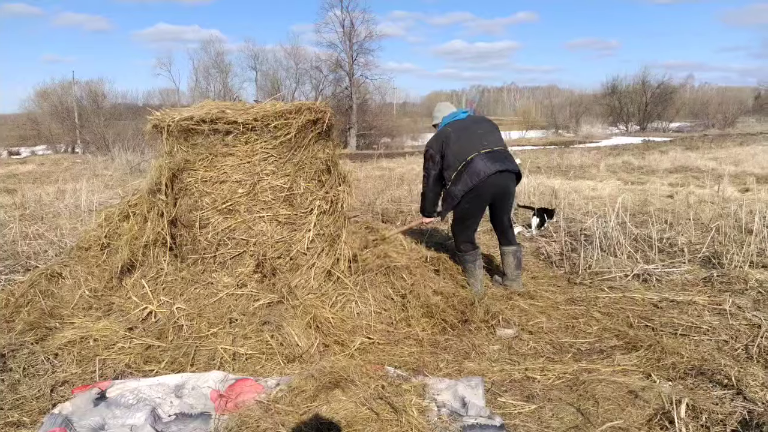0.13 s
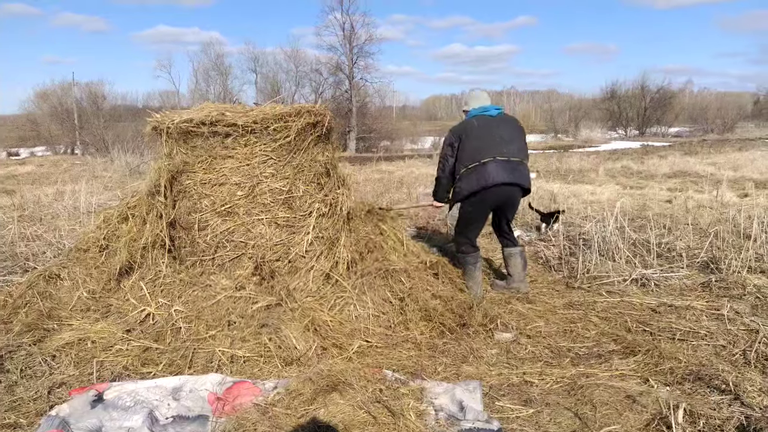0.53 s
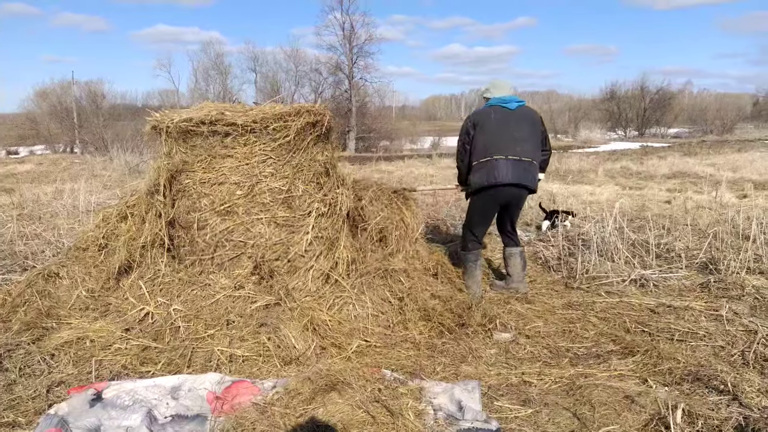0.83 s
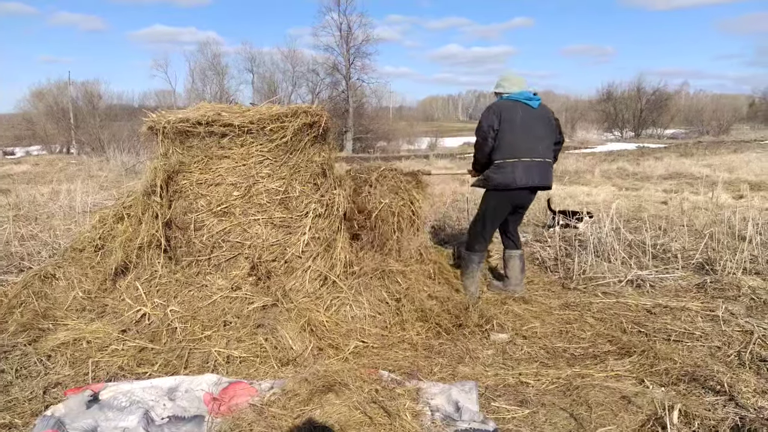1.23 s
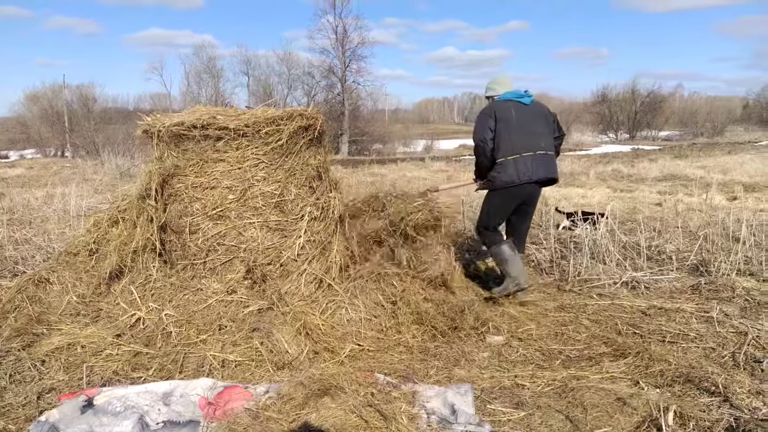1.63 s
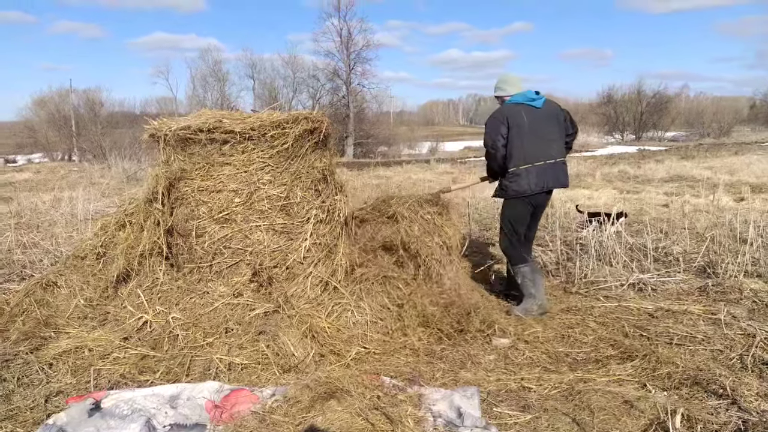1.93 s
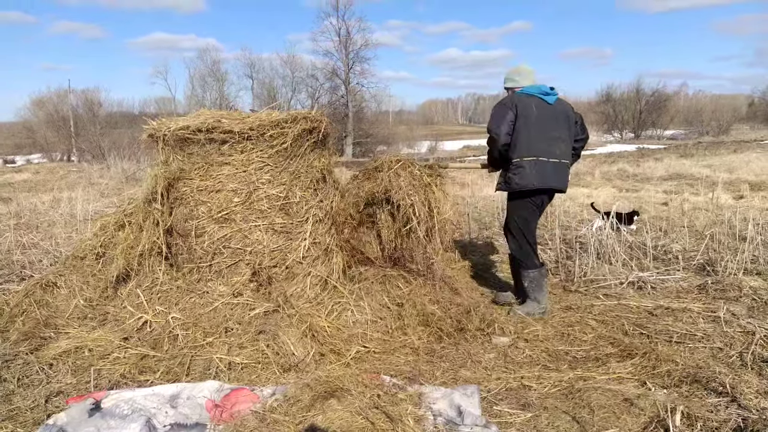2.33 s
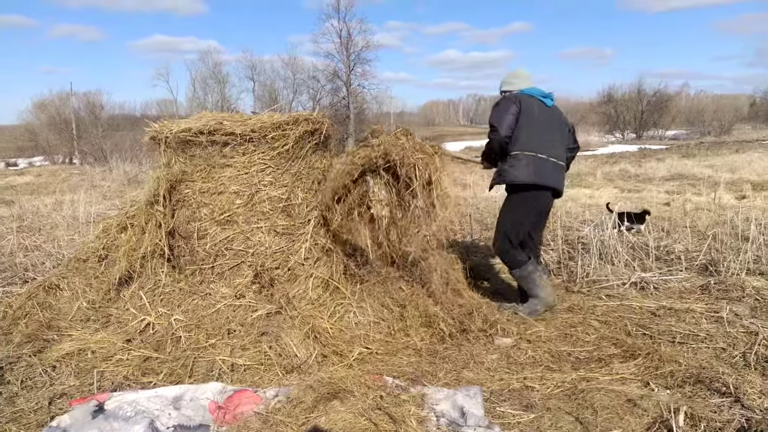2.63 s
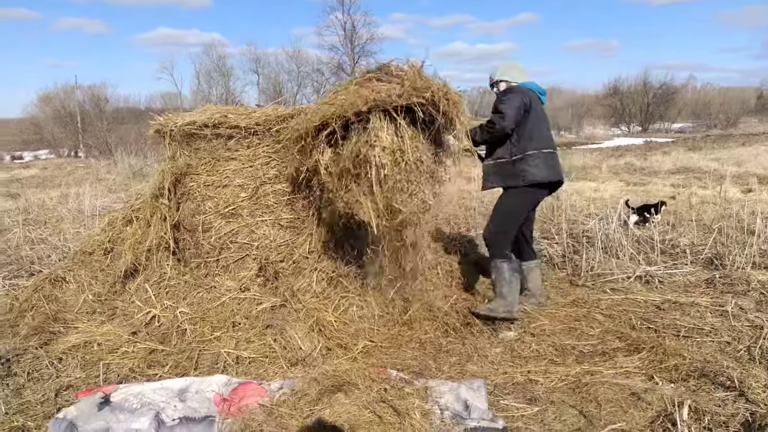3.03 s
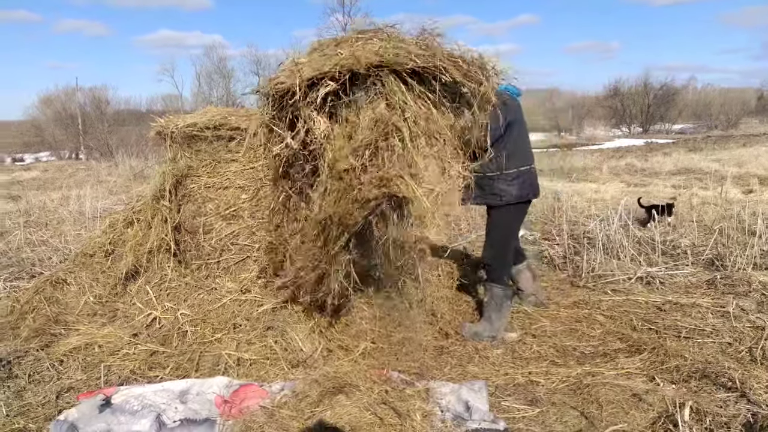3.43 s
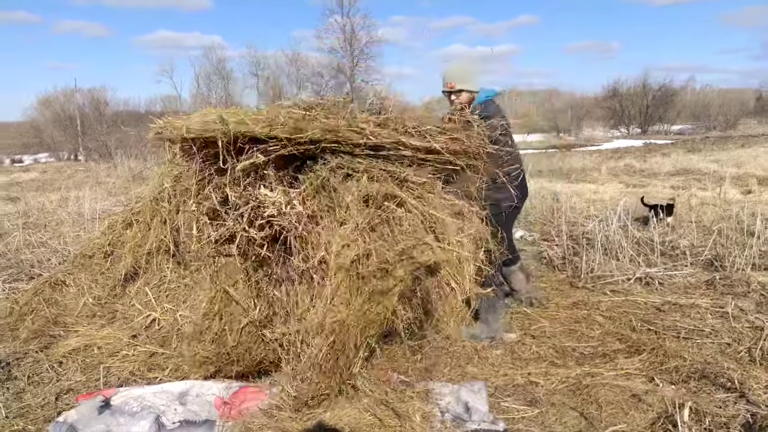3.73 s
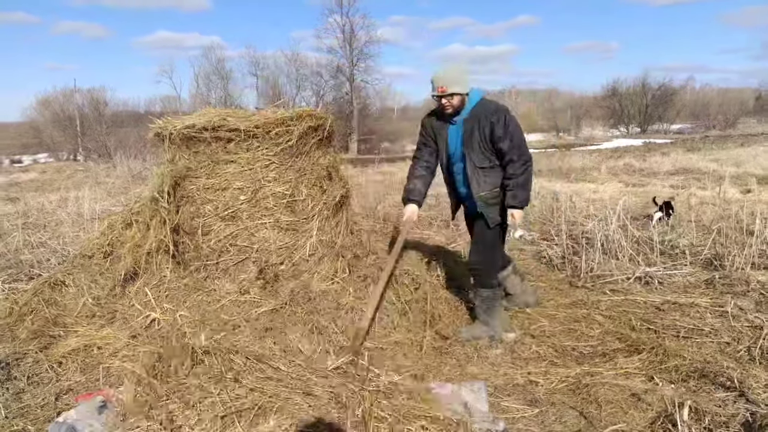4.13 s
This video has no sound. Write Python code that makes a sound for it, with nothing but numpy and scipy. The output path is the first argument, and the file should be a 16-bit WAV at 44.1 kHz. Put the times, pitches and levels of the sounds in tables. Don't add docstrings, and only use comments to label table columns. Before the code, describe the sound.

Wind buffets a small camera outdoors while hay swishes and crackles, ending in a sudden loud, bright rustle near the microphone.

```python
import sys
import numpy as np
from scipy import signal
from scipy.fft import rfft, irfft
from scipy.io import wavfile
from scipy.ndimage import uniform_filter1d

SR = 44100
rng = np.random.default_rng(int(sys.argv[2]) if len(sys.argv) > 2 else 0)


def field_ratio(decibels):
    return 10 ** (np.asarray(decibels, dtype=float) / 20)


def wrap_up_sound(samples):
    columns = np.atleast_2d(samples).T
    tamed = np.clip(columns, -1, 1)
    steps = np.round(tamed * 32767).astype(np.int16)
    wavfile.write(sys.argv[1], SR, steps)


N = 188174


def evened(x):
    return x / np.sqrt(np.mean(x ** 2) + 1e-20)


def smooth_noise(shape, *sizes):
    noise = rng.standard_normal(shape)
    for axis, size in enumerate(sizes):
        noise = uniform_filter1d(noise, size, axis=axis)
    return evened(noise)


def read(points, hz):
    f, value = np.transpose(points)
    return np.interp(np.log(hz + 1), np.log(f + 1), value)[:, None]


def columns(rows, t):
    s, *values = np.transpose(rows)
    return [np.interp(t, s, v) for v in values]


def add(mix, s, sound):
    at = round(s * SR) - len(sound) // 2
    part = mix[max(at, 0):at + len(sound)]
    part += sound[max(-at, 0):][:len(part)]


def ticks(per_s, spread_db):
    chance = rng.random((2, N))
    size = np.minimum(rng.exponential(1, (2, N)), 5)
    sign = rng.standard_normal((2, N))
    return evened((chance < per_s / SR) * field_ratio(spread_db * size) * sign)


# time_s, rubbing_level_db
EFFORT = [(0.0, -63), (0.07, -67), (0.18, -58.5), (0.32, -58), (0.4, -56), (1.26, -47), (1.42, -46.5),
          (1.54, -49.5), (1.78, -54), (1.88, -54.5), (2.3, -47.5), (2.42, -49.5), (2.84, -48.5),
          (3.27, -52), (3.36, -51.5), (3.42, -55.5), (3.46, -52.5), (3.64, -55), (3.81, -52.5),
          (3.93, -46.5), (3.99, -39.5), (4.1, -41), (4.16, -40.5), (4.27, -41)]
# time_s, nearness (0 at the stack, 1 at the camera), left_port_delay_ms
PATH = [
    (0, 0, 0.0),
    (1.9, .03, 0.0),
    (3.1, .1, .012),
    (3.7, .45, .06),
    (3.93, .97, .18),
    (4.12, .97, .185),
    (4.27, .97, .15),
]
# frequency_hz, level_db
FAR_LEFT_COLOUR = [(500, -22), (900, -22.5), (2000, -17), (3000, -19), (3200, -21), (3500, -24.5),
                   (3900, -24.5), (4100, -42), (4300, -28.5), (4800, -16.5), (6400, -12.5), (8000, -20),
                   (8500, -24), (9500, -5.5), (10800, 3.5), (11900, 1.5), (12300, -11)]
FAR_RIGHT_COLOUR = [(500, -20.5), (900, -21.5), (1800, -21.5), (2200, -17), (2600, -20), (3200, -16.5),
                    (4500, -16.5), (6500, -11.5), (9300, -5.5), (10800, -9.5), (11900, -11.5), (12300, -91)]
# frequency_hz, level_db
NEAR_LEFT_COLOUR = [(500, -19), (900, -17.5), (2000, -4), (2400, 0.5), (2600, -12.5), (2800, -3.5),
                    (3100, -18), (3500, -30), (3900, -11.5), (4800, -5.5), (6400, 8), (8000, -6), (8500, 4),
                    (9500, 8.5), (10800, 10), (11900, 13), (12300, -18)]
NEAR_RIGHT_COLOUR = [(500, -8.5), (900, -10.5), (1800, -1.5), (2400, -7), (2600, -15.5), (2900, 1.5),
                     (3200, 0), (4500, 0), (6500, 5), (9300, 10.5), (10800, 6.5), (11900, 4.5),
                     (12300, -51)]
# frequency_hz, level_db
FAR_TOP = [(12050, -50), (12300, -32), (13330, -29), (13480, -19), (14700, -19), (14900, -21.5),
           (15700, -22)]
NEAR_TOP = [(12050, -9), (12300, -5), (13200, -5), (14500, -4), (14800, -8.5), (15700, -10)]
# frequency_hz, likeness (0-1)
FAR_LIKENESS = [(500, 0.43), (1700, 0.95), (2500, 0.94), (3000, 0.08), (4000, 0.2), (5000, 0.72),
                (7000, 0.37), (10000, 0), (12000, 0.3)]
NEAR_LIKENESS = [(500, 0.86), (1700, 0.71), (2200, 0.19), (2700, 0.93), (3300, 0.087), (5000, 0.077),
                 (7000, 0.1), (12000, 0.04)]
# time_s, half_length_s, lift_db, hollow_ring_db
SLIPPING = [
    (1.387, 0.092, 1, -3),
    (0.472, 0.087, 2, 0.5),
    (1.778, 0.086, 3.5, 5.5),
    (2.542, 0.073, 0, 8),
    (3.338, 0.025, 2.5, 6),
    (4.128, 0.058, 3, -4),
]


def hay():
    clumps = smooth_noise(N, 900)
    rub = ticks(per_s=22000, spread_db=-0.43)
    rub = rub * field_ratio(0.5 * clumps + 0.52 * smooth_noise(N, 90))
    hz, t, (one, other) = signal.stft(rub, SR, nperseg=512, noverlap=384)
    row_hz = hz[:, None]
    level_db = columns(EFFORT, t)[0]
    near, delay_ms = columns(PATH, t)
    near = np.clip(near, 0, 1)

    def blend(far, close):
        return (1 - near) * read(far, hz) + near * read(close, hz)

    lean_left_db, top_right_db = -1.32, -33
    flicker = smooth_noise(one.T.shape, 9, 10).T
    top = field_ratio(blend(FAR_TOP, NEAR_TOP) + 3 * flicker)
    below = row_hz < 11990
    left = below * field_ratio(blend(FAR_LEFT_COLOUR[:-1], NEAR_LEFT_COLOUR[:-1]) + lean_left_db / 2) + top
    right = below * field_ratio(blend(FAR_RIGHT_COLOUR[:-1], NEAR_RIGHT_COLOUR[:-1]) - lean_left_db / 2)
    right = right + top * field_ratio(top_right_db)
    fine = (hz > 5000) & (hz < 11800)
    loud = np.sqrt((left ** 2 + right ** 2)[fine].sum(0) / (4 * len(hz)))

    coarse_db = -17 + 0.2756 * np.maximum(-49.5 - level_db, 0)
    coarse = (coarse_db + 15.5) / (1 + (row_hz / 3800) ** 6)
    coarse += 4.1 * np.exp(-((row_hz - 800) / 120) ** 2)
    for s, half_s, lift_db, ring_db in SLIPPING:
        ring = ring_db * np.exp(-((row_hz - 750) / 250) ** 2)
        coarse += np.exp(-((t - s) / half_s) ** 2) * (lift_db + ring)
    patches = smooth_noise(one.T.shape, 20, 8).T
    gain = field_ratio(level_db + coarse + 0.85 * patches) / loud

    same = np.clip(blend(FAR_LIKENESS, NEAR_LIKENESS), 0, 1)
    delay_s = delay_ms / 1000 / (1 + (1500 / (row_hz + 1)) ** 4)
    late = np.exp(-2j * np.pi * row_hz * delay_s)
    at_left = left * (same * one * late + np.sqrt(1 - same ** 2) * other)
    z = np.array([at_left, right * one]) * gain
    return signal.istft(z, SR, nperseg=512, noverlap=384)[1][:, :N]


# start_s, hold_s, left_db, right_db
GUST_LEVELS = [(0, 0.035, -55, -41), (0.067, 0.051, -49, -48), (0.154, 0.23, -55.5, -52),
               (0.467, 0.086, -60, -65), (0.584, 0.069, -57, -47), (0.639, 0.057, -53, -48.5),
               (0.717, 0.023, -44.5, -57), (0.779, 0.12, -49, -42.5), (0.901, 0.15, -49, -45.5),
               (1.067, 0.05, -69, -58), (1.169, 0.04, -67, -55.5), (1.285, .03, -53.5, -55),
               (1.308, 0.095, -56, -43), (1.424, 0.025, -49.5, -50), (1.46, 0.1, -72, -54),
               (1.544, 0.057, -49, -56.5), (1.62, 0.064, -67, -49), (1.714, 0.068, -49, -46.5),
               (1.81, 0.065, -45, -51), (1.92, 0.13, -48, -44.5), (2.048, 0.089, -61, -43.5),
               (2.16, 0.16, -71.5, -66.5), (2.432, 0.047, -72, -59), (2.49, 0.1, -60, -44.5),
               (2.612, 0.054, -76, -55.5), (2.744, .05, -67, -71), (2.86, 0.12, -55.5, -49),
               (2.99, 0.15, -56.5, -49.5), (3.116, 0.061, -43, -44), (3.189, 0.097, -54, -48),
               (3.361, 0.071, -50, -47), (3.43, 0.13, -57, -41.5), (3.595, 0.073, -53, -49.5),
               (3.739, 0.019, -64, -54), (3.777, 0.05, -65.5, -70), (3.85, 0.085, -78, -61.5),
               (3.917, 0.038, -56, -51), (3.994, 0.041, -59, -54.5), (4.052, 0.11, -53.5, -59.5),
               (4.19, .1, -65, -48.5)]


def gusts():
    rise_db_per_s, fall_db_per_s, calm_db = 581, 504, -75
    t = np.arange(0, N / SR + .01, .002)
    start, hold, *port_db = np.transpose(GUST_LEVELS)[:, :, None]
    away_db = np.maximum(rise_db_per_s * (start - t), 0)
    away_db = away_db + np.maximum(fall_db_per_s * (t - start - hold), 0)
    power = [(field_ratio(db - away_db) ** 2).sum(0) + field_ratio(calm_db) ** 2 for db in port_db]
    return np.array([np.interp(np.arange(N) / SR, t, np.sqrt(p)) for p in power])


def eddy(width_ms):
    u = np.arange(-900, 900) / SR * 1000 / width_ms

    def bump(at, wide):
        return np.exp(-4 * np.log(2) * ((u - at) / wide) ** 2)

    push = bump(0, 1.131)
    dips = 0.33 * bump(-1.2, 1.8) + 0.47 * bump(1.27, 1.27)
    shape = push - dips * push.sum() / dips.sum()
    return shape / shape.max()


# time_s, peak_db, width_ms
LEFT_PUSHES = [(0.1054, -32.5, 2), (0.2236, -35.5, 2.3), (0.2395, -37.0, 1.75), (0.7127, -29.0, 1.5),
               (0.7166, -37.5, 1.75), (0.7211, -32.0, 1.75), (0.8454, -29.0, 1.5), (0.8485, -34.0, 1.2),
               (0.8603, -27.0, 2), (0.8794, -34.5, 2.7), (0.9084, -39.5, 1.5), (0.9177, -33.0, 1.75),
               (0.9247, -36.5, 1.2), (0.9431, -26.5, 1.05), (0.9533, -35.0, 1.75), (0.9612, -30.5, 1.35),
               (0.9696, -37.5, 5), (0.9737, -17.0, 1.2), (0.9771, -34.5, 1.2), (1.0397, -38.0, 1.5),
               (1.863, -34.5, 2), (1.9204, -36.5, 2.3), (1.9415, -36.5, 2.3), (1.9771, -29.5, 2.7),
               (1.993, -33.5, 2.3), (2.0007, -23.5, 2.3), (2.0098, -37.0, 2.3), (2.0134, -26.5, 1.75),
               (2.0458, -34.5, 2.7), (2.0535, -26.0, 1.5), (2.0664, -30.5, 1.75), (2.0739, -35.0, 3.1),
               (2.1159, -38.5, 2.7), (2.1227, -36.0, 1.5), (2.1268, -29.0, 1.75), (2.8859, -34.0, 2.3),
               (2.985, -32.5, 2.7), (2.9871, -18.5, 1.5), (2.9902, -39.5, 1.35), (2.9955, -36.5, 2.3),
               (3.1195, -37.0, 1.75), (3.1522, -26.5, 2.3), (3.1592, -19.5, 2.3), (3.1683, -35.0, 2),
               (3.2168, -33.0, 2.7), (3.3937, -33.5, 2), (3.4025, -35.5, 1.75), (3.4336, -34.0, 2.3),
               (3.439, -29.0, 2), (3.4454, -26.5, 2), (3.449, -39.0, 5), (3.4574, -35.0, 2.3),
               (3.4782, -26.5, 2), (3.4964, -29.0, 2.7), (3.505, -36.5, 1.35), (3.5079, -20.0, 1.75),
               (3.5125, -31.0, 1.75), (3.517, -37.0, 1.5), (3.5367, -36.5, 2.7), (3.6424, -36.5, 2.7)]
RIGHT_PUSHES = [(0.0166, -30.5, 2.3), (0.1227, -31.0, 2), (0.1676, -23.5, 2.3), (0.2211, -27.0, 2.3),
                (0.2769, -27.0, 2.3), (0.6519, -26.5, 2.7), (0.7769, -24.5, 2), (0.7882, -28.5, 3.6),
                (0.8023, -34.5, 3.6), (0.8113, -22.0, 2.7), (0.82, -22.0, 2.3), (0.8281, -32.0, 2.7),
                (0.942, -34.5, 2), (0.9794, -23.5, 1.75), (1.0204, -33.0, 2), (1.0311, -26.5, 2.7),
                (1.3766, -27.5, 2), (1.385, -33.0, 3.6), (1.3889, -23.0, 2), (1.3955, -32.0, 2.3),
                (1.4841, -31.5, 2.3), (1.4896, -21.5, 2.3), (1.62, -30.5, 2.7), (1.6361, -33.5, 2.7),
                (1.6574, -30.5, 3.1), (1.6798, -27.0, 2.7), (1.7156, -30.0, 2.3), (1.732, -27.0, 2.7),
                (1.7703, -31.0, 3.1), (1.8746, -35.0, 1.75), (1.8819, -32.0, 3.1), (1.976, -31.0, 1.75),
                (2.0027, -26.5, 1.75), (2.0952, -35.0, 2.7), (2.1429, -33.0, 2.3), (2.5177, -29.0, 2.3),
                (2.5519, -31.5, 2.3), (2.5703, -24.5, 2.3), (3.0177, -26.0, 2.3), (3.0787, -29.0, 1.5),
                (3.1277, -32.0, 4.2), (3.1347, -24.5, 2.3), (3.1451, -30.0, 5), (3.1512, -26.5, 2.3),
                (3.2512, -34.0, 2.7), (3.2658, -30.0, 2), (3.4313, -33.0, 4.2), (3.4333, -26.0, 1.75),
                (3.4363, -11.5, 1.5), (3.4458, -33.5, 2.7), (3.4478, -15.5, 1.5), (3.4537, -25.0, 1.75),
                (3.4787, -29.0, 2), (3.5036, -30.0, 2.3), (3.5193, -29.5, 1.75), (3.5227, -33.5, 0.9),
                (3.5299, -25.5, 1.75), (3.546, -26.5, 2.7), (3.5519, -22.5, 2), (3.5612, -33.0, 2.3)]
# time_s, peak_db, width_ms
LEFT_SUCKS = [(0.2533, -36.5, 2.7), (0.4644, -36.5, 3.6), (0.6998, -37.5, 4.2), (0.7701, -41.0, 5),
              (0.7755, -40.0, 1.75), (0.7939, -40.5, 2.7), (0.8515, -34.0, 5), (0.8556, -29.0, 2),
              (0.8626, -31.0, 1.2), (0.9136, -36.0, 1.2), (0.9302, -33.0, 3.1), (0.9342, -35.5, 1.2),
              (0.9385, -26.0, 2.3), (0.9406, -38.0, 1.2), (0.9474, -32.0, 1.05), (0.9501, -40.5, 1.05),
              (0.9717, -29.5, 1.2), (1.0229, -40.5, 1.75), (1.3195, -36.5, 2.7), (1.3619, -34.0, 2.3),
              (1.5156, -38.0, 2.3), (1.5744, -36.5, 2.3), (1.8533, -36.5, 2), (1.9594, -31.0, 2.3),
              (2.0195, -41.0, 1.5), (2.0336, -40.0, 4.2), (2.0397, -39.5, 1.75), (2.1317, -38.0, 4.2),
              (2.8941, -32.0, 2.3), (2.9202, -40.0, 3.1), (2.927, -36.0, 2.3), (2.9662, -39.0, 2),
              (2.9755, -38.0, 2.7), (3.0615, -40.5, 1.75), (3.0778, -33.5, 2.3), (3.081, -39.0, 5),
              (3.1023, -40.0, 2.3), (3.1073, -33.0, 2.3), (3.1122, -40.0, 1.5), (3.1379, -37.0, 3.6),
              (3.1422, -27.0, 1.75), (3.149, -32.0, 1.5), (3.1556, -39.5, 1.5), (3.1755, -36.0, 1.75),
              (3.1853, -37.0, 2), (3.2011, -39.0, 2.3), (3.2458, -38.5, 3.1), (3.473, -39.0, 2.3),
              (3.4896, -36.5, 1.5), (3.4941, -25.5, 1.75), (3.4984, -38.0, 1.2), (3.5025, -31.0, 1.5),
              (3.5104, -37.0, 1.05), (3.527, -34.0, 2.3), (3.5585, -36.5, 1.5), (3.5662, -37.0, 1.75),
              (3.9587, -39.5, 2.7), (4.0565, -39.0, 3.1), (4.0991, -38.5, 3.1), (4.2615, -34.0, 2)]
RIGHT_SUCKS = [(0.0331, -28.0, 2.3), (0.3549, -35.0, 2.7), (0.6413, -37.0, 1.5), (0.6435, -26.5, 3.1),
               (0.7859, -25.0, 2), (0.8045, -27.0, 2), (0.8093, -33.0, 1.5), (0.8159, -34.5, 1.2),
               (0.8229, -30.0, 1.35), (0.8447, -31.0, 2.3), (0.8678, -36.5, 3.1), (0.9506, -32.5, 3.6),
               (0.961, -33.0, 3.1), (0.9717, -36.0, 2), (1.3111, -33.0, 2), (1.3272, -36.5, 5),
               (1.3345, -33.5, 1.75), (1.3408, -35.0, 4.2), (1.3544, -35.0, 2.7), (1.3628, -30.0, 2.3),
               (1.3689, -35.0, 2.3), (1.48, -36.0, 2), (1.6488, -34.5, 2.3), (1.8512, -35.0, 2.7),
               (1.9408, -30.0, 2.7), (1.949, -36.5, 1.75), (1.9546, -31.5, 2.7), (1.9626, -31.0, 3.1),
               (1.9937, -31.0, 2.3), (2.0005, -33.5, 2.7), (2.0234, -32.5, 2.3), (2.1254, -32.5, 2),
               (2.4921, -35.5, 3.1), (2.5882, -30.5, 2.3), (3.0705, -36.5, 2.7), (3.115, -31.0, 2.7),
               (3.1476, -36.0, 1.5), (3.1673, -36.5, 2), (3.1735, -29.5, 2), (3.1834, -36.0, 2),
               (3.2859, -33.5, 2.3), (3.3186, -36.0, 2.7), (3.3739, -32.0, 3.1), (3.439, -25.5, 1.5),
               (3.4612, -33.5, 3.6), (3.4633, -21.5, 1.5), (3.4664, -20.0, 0.9), (3.4698, -20.0, 2),
               (3.473, -26.0, 1.05), (3.4751, -29.0, 5), (3.4853, -32.0, 1.5), (3.4921, -34.0, 2.7),
               (3.5147, -34.5, 2.7), (3.5247, -19.0, 1.75), (3.5268, -32.5, 1.05), (3.532, -31.5, 5),
               (3.5429, -29.0, 1.5), (3.5492, -29.5, 1.05), (3.5544, -31.5, 5), (3.598, -36.0, 3.6)]
# frequency_hz, level_db
RUMBLE_COLOUR = [(20, -1), (40, -11.5), (90, 4), (200, -2.5), (350, -16.5), (600, -35.5), (1200, -49.5)]


def wind():
    out = np.zeros((2, N))
    for port, (pushes, sucks) in enumerate(((LEFT_PUSHES, LEFT_SUCKS), (RIGHT_PUSHES, RIGHT_SUCKS))):
        for s, db, width_ms in pushes:
            add(out[port], s, field_ratio(db) * eddy(width_ms))
        for s, db, width_ms in sucks:
            add(out[port], s, -field_ratio(db) * eddy(width_ms)[::-1])
    swarm = np.zeros((2, N))
    for width_ms in (2.8, 3.8, 5.5):
        strikes = abs(ticks(per_s=40, spread_db=-1.0))
        swarm += signal.oaconvolve(strikes, eddy(width_ms)[None], "same")
    hz = np.fft.rfftfreq(N, 1 / SR)
    rumble = irfft(rfft(rng.standard_normal((2, N))) * field_ratio(read(RUMBLE_COLOUR, hz).T), N)
    drift = evened(signal.sosfilt(signal.butter(3, 87.5, fs=SR, output="sos"), rumble[::-1]))
    air = out + field_ratio(-72) * drift + gusts() * (evened(swarm) + field_ratio(-2.5) * evened(rumble))
    port_low_hz, port_high_hz = 32, 700
    passed = 1 / np.sqrt((1 + (port_low_hz / (hz + 1)) ** 4) * (1 + (hz / port_high_hz) ** 6))
    air = irfft(rfft(air) * passed, N)
    add(air[1], 0, -field_ratio(-33) * eddy(1.5)[::-1])
    return air


# time_s, peak_db, left_right_db, brightness_hz
BREAKS = [(.1156, -54, -3, 5000), (.18, -48, -6, 5500), (.2224, -50, -3, 5000), (.376, -52, 0, 3000),
          (.6484, -54, -2, 3000), (.9453, -46, -3, 2500), (2.0941, -50, -1, 3000), (2.2677, -44, -3, 5000),
          (3.2181, -46, -3, 5000), (3.287, -43, -2, 5500), (3.3173, -35.5, -5, 5500),
          (3.3172, -44, -4, 2600), (3.3192, -49, -3, 1300), (3.3485, -41.5, 0, 5500), (3.361, -45, 0, 5000),
          (3.6082, -52, -1, 3000), (3.996, -33, 0, 5500), (4.047, -34, 2, 5500), (4.0622, -40, -2, 3000),
          (4.078, -34, 0, 5500), (4.135, -34, 2, 5500), (4.159, -33, 0, 5500)]


def snaps():
    out, t = np.zeros((2, N)), np.arange(-1200, 1200) / SR - .001
    for s, db, pan_db, hz in BREAKS:
        splinters = 0.025 * rng.standard_normal(len(t)) * (t > 0) * field_ratio(-60 * abs(t) / 0.05)
        crack = splinters + (abs(t) < .5 / SR)
        band = signal.butter(3, [1000, min(2 * hz, 11000)], "band", fs=SR, output="sos")
        crack = signal.sosfilt(band, crack)
        crack = signal.sosfilt(signal.butter(12, 11900, fs=SR, output="sos"), crack)
        crack *= field_ratio(db) / abs(crack).max()
        echo = .6 * np.roll(crack, shift=11)
        add(out[0], s, field_ratio(pan_db / 2) * (crack - echo))
        add(out[1], s, field_ratio(-pan_db / 2) * crack)
    return out


def scene():
    return hay() + snaps() + wind()


# frequency_hz, step_db
STEP_CURVE = [(100, -29), (500, -28), (1000, -15.5), (2500, -10.5), (3700, -13.5), (4800, -7), (6300, -6.5),
              (7500, -12), (9000, -13), (11000, -11.5), (12100, -9), (13300, -10), (13600, -10.5),
              (14400, -12.5), (15600, -12)]
# frequency_hz, rarity (standard deviations)
EMPTY_LINES = [(1500, 3), (2500, 1.7), (3600, 1.9), (4700, 1.2), (6200, 1.35), (7200, 2.6), (9000, 4)]
# start_s, end_s, low_hz, high_hz
SILENT_BANDS = [(.95, 1.3, 13300, 13900), (1.06, 1.22, 13900, 14250), (3.44, 3.49, 4750, 4920),
                (3.45, 3.55, 5850, 5980), (3.675, 3.72, 6050, 6250), (3.745, 3.79, 2600, 2750),
                (3.95, 3.99, 2620, 2760), (3.96, 4.13, 2480, 2660), (3.99, 4.03, 4620, 4780),
                (4.02, 4.07, 4200, 4700), (4.19, 4.24, 12100, 13500)]


def starve(x):
    hop, bins, band, edge_hz = 1024, 736, 8, 12050
    lead, frames = 2 * hop - 688, N // hop + 3
    hz = (np.arange(bins) + .5) * SR / (2 * hop)
    s = ((np.arange(frames) + 1) * hop - lead)[:, None] / SR

    basis = np.cos(np.pi / hop * np.outer(np.arange(2 * hop) + .5 + hop / 2, np.arange(bins) + .5))
    basis *= np.sqrt(2 / hop)
    halves = np.pad(x, ((0, 0), (lead, (frames + 1) * hop - lead - N))).reshape(2, frames + 1, hop)
    soft = smooth_noise(frames + 1, 3) > .3
    sine = np.sin(np.pi * (np.arange(hop) + .5) / (2 * hop))
    ramp = np.cumsum(np.kaiser(hop + 1, 4 * np.pi))
    rise = np.where(soft[:, None], sine, np.sqrt(ramp[:hop] / ramp[-1]))
    window = np.concatenate([rise[:-1], rise[1:, ::-1]], axis=1)
    lines = np.concatenate([halves[:, :-1], halves[:, 1:]], axis=2) * window @ basis

    hiss = (lines[:, :, (hz > 8000) & (hz < 12000)] ** 2).mean((0, 2))
    hiss_db = 10 * np.log10(hiss + 1e-12)[:, None]
    jitter_db = np.repeat(4.8 * smooth_noise((frames, bins // band), 3), band, axis=1)
    step = field_ratio(-42 + 1.08 * (hiss_db + 42) + read(STEP_CURVE, hz).T + jitter_db)
    step *= field_ratio(.1 * (hiss_db + 62) * (hz > edge_hz))

    joint = (smooth_noise(frames, 3) > 0)[:, None] & (hz < edge_hz)

    def turn(v):
        return np.where(joint, np.array([v[0] + v[1], v[0] - v[1]]) / np.sqrt(2), v)

    lines = turn(lines)
    power = np.repeat((lines ** 2).reshape(2, frames, -1, band).mean(3), band, axis=2)
    heard = uniform_filter1d(power, size=2 * band, axis=2) > (step * field_ratio(-10)) ** 2
    luck = np.repeat(smooth_noise((frames, bins // 4), 3), 4, axis=1)
    kept = ((hz < edge_hz) | heard) & (luck < read(EMPTY_LINES, hz).T)
    for first, last, low_hz, high_hz in SILENT_BANDS:
        kept = kept & ~((s > first) & (s < last) & (hz > low_hz) & (hz < high_hz))
    step = np.where(hz < edge_hz, np.minimum(step, field_ratio(14) * np.sqrt(power) + 1e-9), step)
    whole = np.floor(abs(lines / step) ** .75 + .4054) * kept
    pieces = turn(np.sign(lines) * whole ** (4 / 3) * step) @ basis.T * window
    joined = pieces[:, 1:, :hop] + pieces[:, :-1, hop:]
    return joined.reshape(2, -1)[:, lead - hop:][:, :N]


def band_limit(x):
    return signal.sosfilt(signal.butter(12, 15780, fs=SR, output="sos"), x)


def record(dry):
    mix = starve(dry)
    return band_limit(mix)


dry = scene()
out = record(dry)
wrap_up_sound(out)
```